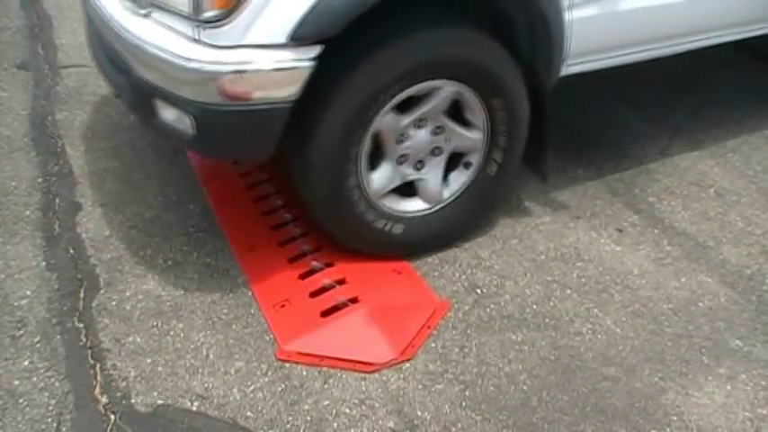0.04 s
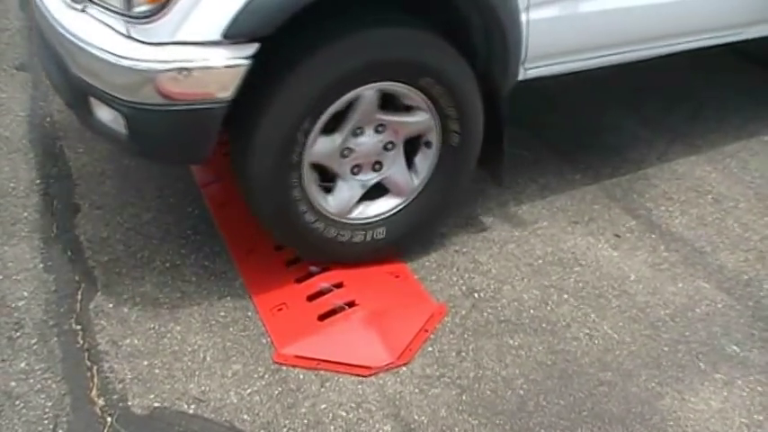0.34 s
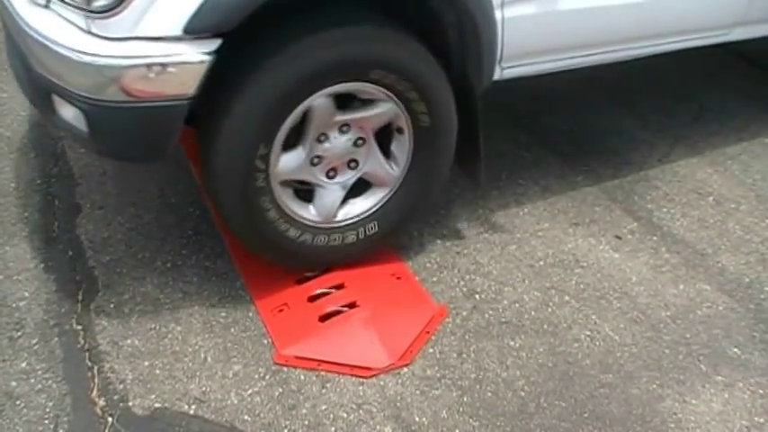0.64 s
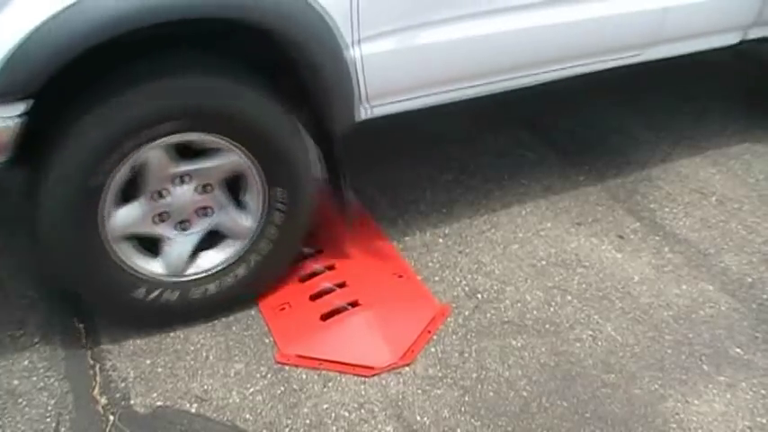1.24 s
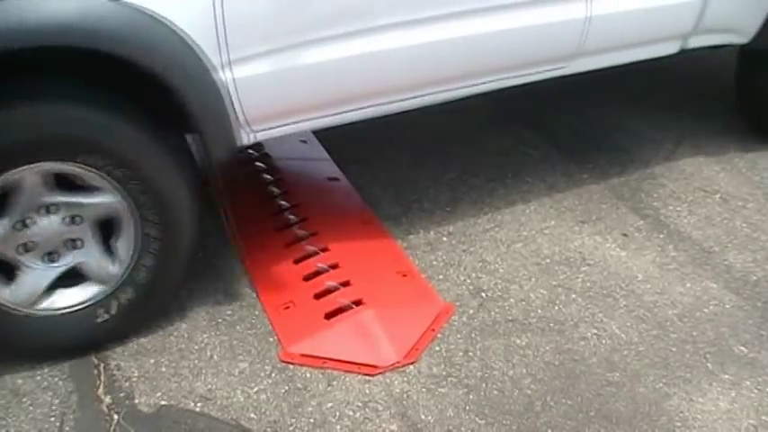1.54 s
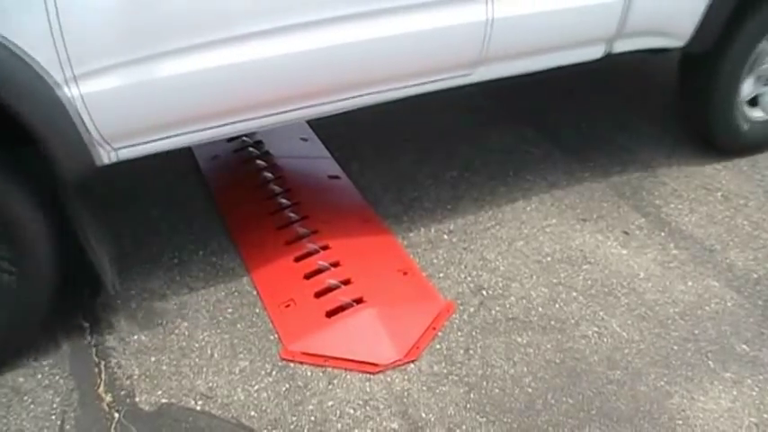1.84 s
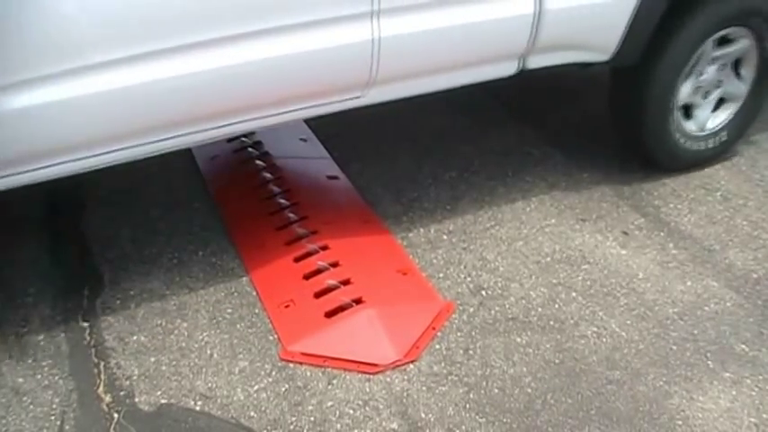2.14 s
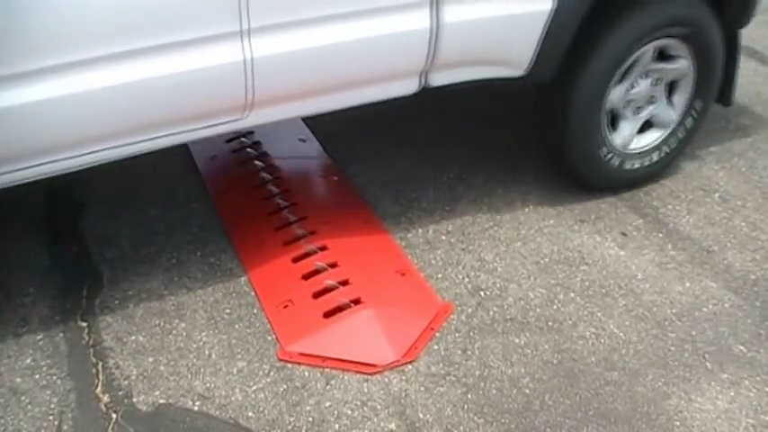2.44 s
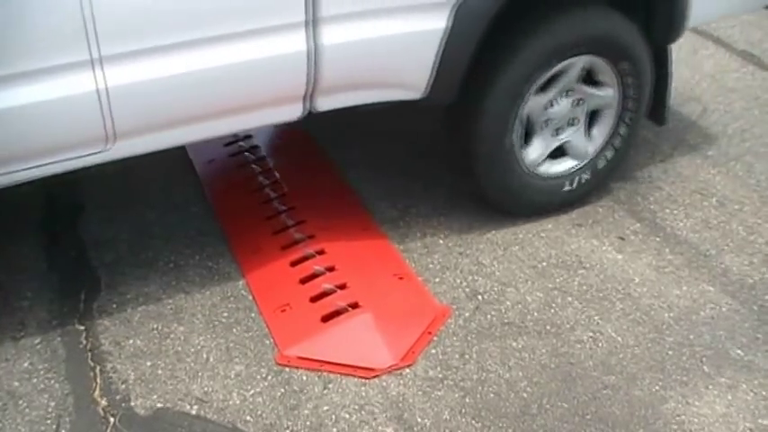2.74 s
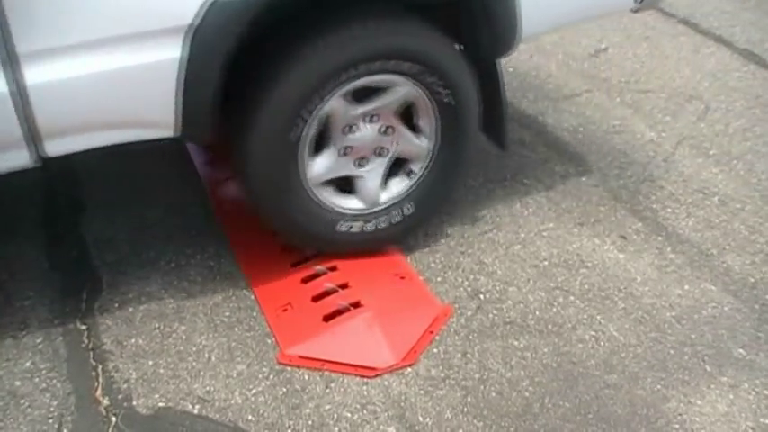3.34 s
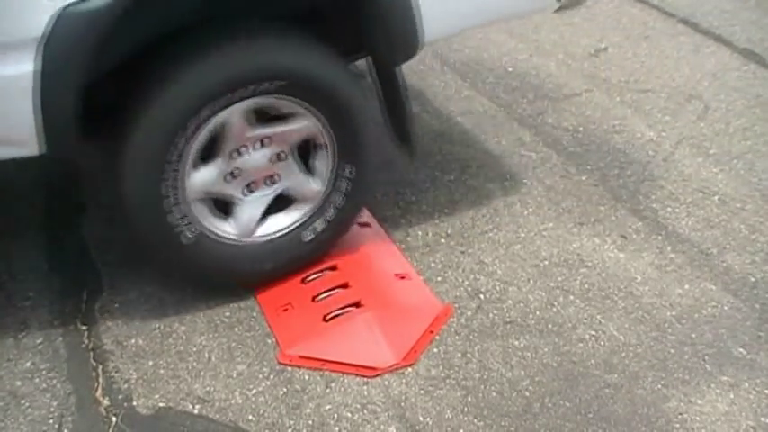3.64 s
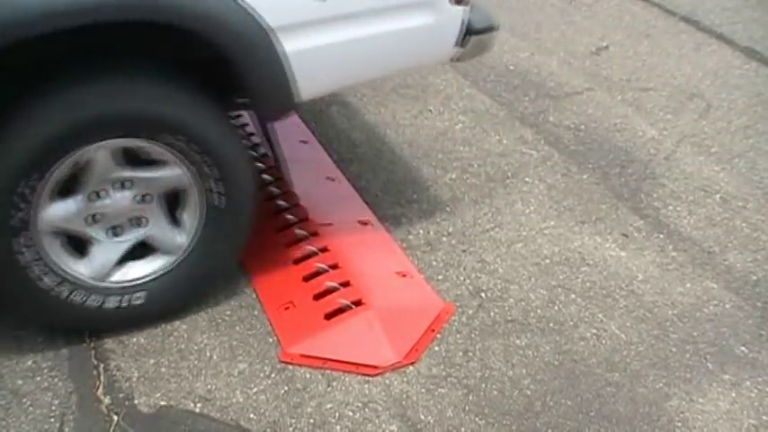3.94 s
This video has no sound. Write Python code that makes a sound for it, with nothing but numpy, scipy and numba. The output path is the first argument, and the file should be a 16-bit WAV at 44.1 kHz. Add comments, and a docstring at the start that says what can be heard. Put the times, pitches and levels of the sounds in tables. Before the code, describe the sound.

A steel spike strip clatters under a creeping pickup truck, heard close over a low engine, fan hiss and faint tire grit. A clack comes at 0.5 seconds, then a loud ringing clatter around 1.2 as the spikes snap back. A brake squeaks briefly at 2.7. The rear wheel lands with a thudding clank at 3.2, scrubs lightly, and releases another loud metallic clatter around 3.8.

```python
"""Pickup over a spike strip.

A pickup creeps over a steel spike strip on asphalt. Wheels knock the plate and fold the sprung spikes,
which snap back with a ringing clatter. The engine runs just above idle, its fan roars and hisses,
tyres crunch grit and scrub, a brake squeaks once. Heard close; a limiter ducks the hardest clacks."""
import sys
import numpy as np
from scipy import signal
from scipy.fft import rfft, irfft
from scipy.io import wavfile
from scipy.ndimage import uniform_filter1d
from numba import njit

SR = 44100
rng = np.random.default_rng(int(sys.argv[2]) if len(sys.argv) > 2 else 0)


def persist_wave(psi):
    """Save psi, clipped to +-1, as 16-bit WAV."""
    counts = np.round(np.clip(psi, -1, 1) * 32767).astype(np.int16)
    wavfile.write(sys.argv[1], SR, np.atleast_2d(counts).T)


N = 176400

# Running truck. Each row: time in seconds, then engine, fan roar and fan hiss levels in dB.
TRUCK_LEVELS = [(0, -41.5, -41, -45.5), (.5, -40, -39.5, -43), (.75, -36, -36, -40),
                (1.15, -38, -34.5, -43), (1.4, -31.5, -32, -38), (1.58, -37, -37, -43),
                (1.85, -41.5, -37.5, -43), (2.2, -41.5, -38.5, -42), (2.6, -42, -39, -43.5),
                (3.05, -41, -37.5, -44), (3.45, -42.5, -38.5, -44.5), (4, -38.5, -34.5, -42.5)]
# Base plate. Each row: mode frequency in Hz, relative level in dB, t60 in seconds.
BASE_PLATE_MODES = [(361, -9, 0.43), (647, -2, 0.19), (950, -1, 0.1), (1034, 4, 0.21), (1210, -5, 0.18),
                    (1346, 5.5, 0.15), (1430, -10, 0.6), (1690, -25, 0.081), (1944, -2.5, 0.1),
                    (2116, 1, 0.098), (2657, 3.5, 0.094)]
# Direction of the strip. Each row: frequency in Hz, left over right in dB, left lead in radians.
STRIP_DIRECTION = [(300, -2.5, 0.5), (1100, 3.5, 0.37), (2200, 3.5, 0), (3700, 1, 0.5), (5360, 4.5, 0.16),
                   (6360, 2.5, 1), (6600, 1, 1.5), (8300, -13, -17.5), (9700, -2, -3)]
ATTACK_S = 0.0034
BUZZ_DB, BUZZ_PER_S = 2, 87  # loose steel chatters as it rings


def undb(db):
    """Decibels to gain."""
    return 10 ** (np.asarray(db) / 20)


def unit(x):
    """Scale to rms 1."""
    return x / np.sqrt(np.mean(x ** 2) + 1e-18)


def curve(table):
    """Interpolate each column over time."""
    times, *columns = np.array(table, float).T
    return [np.interp(np.arange(N) / SR, times, c) for c in columns]


def spectrum(table, size):
    """Interpolate each column over log frequency."""
    hz, *columns = np.array(table, float).T
    return [np.interp(np.log(np.fft.rfftfreq(size, 1 / SR) + 1), np.log(hz), c) for c in columns]


def colour(x, table):
    """Filter by rows of frequency in Hz, gain in dB."""
    return irfft(rfft(x) * undb(spectrum(table, len(x))[0]), len(x))


def noise(table, size=N):
    """Coloured noise, rms 1."""
    return unit(colour(rng.standard_normal(size), table))


def walk(per_s, size=N):
    """Smooth random drift, rms 1."""
    hold = max(int(SR / per_s), 1)
    steps = rng.standard_normal(size)[np.arange(size) // hold]
    return unit(uniform_filter1d(steps, hold))


def stereo(mid, side, direction):
    """Direct sound with level and phase differences between left and right, plus diffuse sound."""
    balance_db, lead_rad = spectrum(direction, N)
    ratio = undb(balance_db) * np.exp(1j * lead_rad)
    spread = (ratio - 1) / (ratio + 1)
    spread = spread / np.maximum(1, np.abs(spread) / undb(3))  # at most 3 dB over mid
    apart = irfft(rfft(mid) * spread, N) + side
    return np.array([mid + apart, mid - apart])


def add(out, start_s, sound):
    """Mix a sound in at its time."""
    i = int(start_s * SR)
    out[..., i:i + sound.shape[-1]] += sound[..., :N - i]


def fade(t, t60_s):
    """Exponential decay."""
    return np.exp(-np.log(1000) * t / t60_s)


def ring(modes, t, damping=1, scatter_db=2.5):
    """Decaying modes, struck at a slightly different spot each time."""
    hz, db, t60_s = np.array(modes).T[:, :, None]
    gain = undb(db + scatter_db * rng.standard_normal(hz.shape))
    waves = np.sin(2 * np.pi * (hz * t + rng.random(hz.shape))) * fade(t * damping, t60_s)
    return (gain * waves).sum(axis=0) / np.sqrt(np.sum(gain ** 2) / 2)


def grit(per_s=100, level_db=-53, spread_db=1.5):
    """Stones crack under the tyres at random."""
    hits = rng.random(N) < per_s / SR
    cracks = hits * undb(spread_db * np.minimum(rng.exponential(size=N), 4))
    crunch = colour(cracks, [(200, 3), (1200, 10.5), (5500, -18), (9000, 8.5), (13000, -37)])
    return unit(crunch) * undb(level_db)


def fan(firings):
    """Air roars and hisses; the hiss throbs at the firing rate."""
    # Air noise spectra. Each row: frequency in Hz, density in dB.
    roar_colour = [(60, -6), (180, 0), (260, 4), (360, 2), (480, -0.5), (800, -5.5), (1250, -5),
                   (1650, -9.5), (2250, -7.5), (2900, -16), (5000, -16.5), (12000, -56)]
    hiss_colour = [(1000, -25), (3000, -5), (4000, -10), (5000, -3.5), (5600, 3.5), (6200, 2), (6900, -6.5),
                   (8000, -7), (9200, -9), (10500, -16), (12500, -34)]
    _, roar_db, hiss_db = curve(TRUCK_LEVELS)
    roar = noise(roar_colour) * undb(roar_db + walk(24.94))
    hiss = noise(hiss_colour) * undb(hiss_db + 0.38 * walk(22))
    throb = 1 + 0.045 * np.cos(2 * np.pi * firings)
    return roar + hiss * throb


def engine(firings, scatter_db=2.5, rumble_db=2.5):
    """Six uneven cylinders pulse over a rumble. Returns direct and diffuse sound."""
    # Relative level of each cylinder in dB, in firing order.
    cylinder_db = [1.5, 2.5, -4, 0, -6, -8]
    # Engine spectrum. Each row: frequency in Hz, gain in dB.
    engine_colour = [(26, -34), (35, -40), (55, -12.5), (75, -1.5), (105, 2), (155, 3), (200, -2),
                     (300, -11.5), (500, -24), (1500, -71)]
    at = np.flatnonzero(np.diff(np.floor(firings)))
    pulses = np.zeros(N)
    pulses[at] = undb(np.resize(cylinder_db, len(at)) + scatter_db * rng.standard_normal(N)[:len(at)])
    beat = unit(colour(pulses - pulses.mean(), engine_colour))
    direct = unit(beat + undb(rumble_db) * noise(engine_colour))
    gain = undb(curve(TRUCK_LEVELS)[0])
    return direct * gain, noise(engine_colour) * gain


def truck(speed_jitter=0.0118):
    """Engine, fan and grit, each with a direct and a diffuse part."""
    # Engine speed. Each row: time in seconds, firings per second.
    firing_rate = [(0, 51.8), (.9, 53.5), (1.7, 49), (2.1, 53.5), (2.9, 47.2), (3.5, 54.5), (4, 51)]
    # Stereo width. Each row: frequency in Hz, diffuse gain in dB.
    width = [(25, -6), (70, -24), (200, -21), (500, -14), (1200, -10), (4000, -12.5), (5800, -16.5),
             (7000, 6), (9000, 2), (12000, -17)]
    # Direction of the truck. Each row: frequency in Hz, left over right in dB, left lead in radians.
    direction = [(100, -2, 0), (700, 0, 0.52), (1300, 4, 0.5), (2300, 5, 0), (4200, 3.5, 0.18),
                 (5800, 3.5, -0.7), (6500, 2.5, -0.5), (7370, -7.5, -5.5), (9150, -6.5, -2)]
    firings = np.cumsum(curve(firing_rate)[0] * (1 + speed_jitter * walk(24.71))) / SR
    direct, diffuse = [part + fan(firings) + grit() for part in engine(firings)]
    return stereo(direct, colour(diffuse, width), direction)


def creaks(rough_db=3.5, chirp_s=0.022, chirp_hz=2266, chirp_width_hz=40):
    """Short, rough noise bands: tyre rubber sticking and slipping, and one tone with the brake squeak."""
    # Each row: start and length in seconds, level in dB, band centre and half-width in Hz.
    # At 2.759 s: a brief lower tone sounding with the brake squeak. The other rows are tyre scrubs.
    bursts = [(1.128, 0.095, -34, 1100, 900), (1.712, 0.15, -47.5, 1940, 300),
              (2.759, 0.034, -36.5, 1330, 120), (3.448, 0.13, -37, 2430, 520),
              (3.5, 0.018, -28.5, 2070, 550), (3.700, 0.057, -35, 1430, 900), (3.743, 0.018, -18, 1720, 90)]
    # Chirps of a stuttering tyre. Each row: start in seconds, level in dB.
    stutter = [(0.138, -49), (0.183, -48), (0.258, -45), (0.324, -42.5), (0.349, -47), (0.392, -52),
               (0.425, -51)]
    chirps = [(start_s, chirp_s, db, chirp_hz, chirp_width_hz) for start_s, db in stutter]
    out = np.zeros(N)
    for start_s, length_s, db, hz, width_hz in bursts + chirps:
        band = np.exp(-((np.fft.rfftfreq(SR, 1 / SR) - hz) / width_hz) ** 2)
        rasp = irfft(rfft(rng.standard_normal(SR)) * band) * undb(rough_db * walk(134, SR))
        size = int(length_s * SR)
        add(out, start_s, undb(db) * unit(rasp[:size]) * signal.windows.tukey(size, .5))
    return stereo(out, 0, STRIP_DIRECTION)


def brake(waver_hz=3.9, octave_db=-21, pan_db=4):
    """A pad sings one clean note and slides up as it lets go."""
    # Each row: time in seconds, pitch in Hz, level in dB.
    squeak = [(2.715, 3220, -45), (2.723, 3201, -25.5), (2.756, 3211, -23), (2.800, 3204, -27.5),
              (2.808, 3310, -36), (2.816, 3400, -43)]
    hz, db = curve(squeak)
    t = np.arange(N) / SR
    phase = 2 * np.pi * np.cumsum(hz + waver_hz * walk(150)) / SR
    gate = (t > squeak[0][0]) * (t < squeak[-1][0])
    note = (np.sin(phase) + undb(octave_db) * np.sin(2 * phase)) * undb(db) * gate
    return note * undb(np.array([[pan_db], [-pan_db]]) / 2)


def wheel_knocks():
    """A wheel bumps the strip against the asphalt: dull thud, hollow clank."""
    # Each row: start in seconds, thud and clank levels in dB, thud t60 in seconds.
    knocks = [(0.4957, -21.5, -35, 0.087), (1.177, -18, -32, 0.085), (3.201, -16.5, -19, .1)]
    # Thud spectrum. Each row: frequency in Hz, density in dB.
    thud_colour = [(80, -10), (330, 1), (700, 5.5), (1300, -8.5), (2400, -18), (9000, -70)]
    size = SR // 2
    t, out = np.arange(size) / SR, np.zeros(N)
    for start_s, thud_db, clank_db, t60_s in knocks:
        thud = undb(thud_db) * noise(thud_colour, size) * fade(t, t60_s)
        clank = undb(clank_db + BUZZ_DB * walk(BUZZ_PER_S, size)) * ring(BASE_PLATE_MODES, t)
        add(out, start_s, (thud + clank) * np.minimum(t / ATTACK_S, 1))
    return stereo(out, 0, STRIP_DIRECTION)


def shaft_snaps():
    """Freed spikes hit their stop and leave their shaft ringing."""
    # Each row: start in seconds, level in dB.
    snaps = [(1.2185, -18), (3.797, -11.5)]
    # Each row: mode frequency in Hz, relative level in dB, t60 in seconds.
    shaft_modes = [(974, -11, 0.35), (1315, -10, 0.35), (1448, -3, 0.52), (1785, 1, 0.2), (2012, 1, 0.2),
                   (2078, 0, 0.42), (2170, 1, 0.3), (2616, -8, 0.3)]
    t, out = np.arange(SR) / SR, np.zeros(N)
    for start_s, db in snaps:
        clang = undb(db + BUZZ_DB * walk(BUZZ_PER_S, SR)) * ring(shaft_modes, t)
        add(out, start_s, clang * np.minimum(t / ATTACK_S, 1))
    return stereo(out, 0, STRIP_DIRECTION)


def spike_clatter(hold_s=0.0038, chatter_db=1.82, plate_ring_db=-9, spike_buzz_db=4, free_t60_s=0.15):
    """Each blow cracks steel on steel, buzzes the spikes and rattles the plate, which rings on."""
    # Each row: start in seconds, plate, crack and spike levels in dB, rattle t60 in seconds.
    blows = [(0.4948, -20.5, -12.5, -43, 0.064), (0.772, -44, -28.5, -54, 0.032),
             (1.0398, -39, -23.5, -38, 0.022), (1.112, -35, -36, -55, 0.02), (1.146, -37, -33, -54, 0.34),
             (1.176, -13.5, -13, -29, 0.15), (1.194, -18, -19, -35, 0.059), (1.2119, -9, -12, -29, 0.016),
             (1.2185, -4.5, 3, -0.5, 0.11), (1.248, -10, -11, -10, 0.18), (1.548, -46, -32.5, -42, 0.11),
             (3.2005, -13.5, -25.5, -36, 0.15), (3.206, -18, -19, -19, 0.12),
             (3.374, -33.5, -33.5, -41, 0.5), (3.394, -23, -29, -36, .11), (3.499, -27.5, -32.5, -53, 0.14),
             (3.742, -16, -17.5, -22, 0.24), (3.781, -10.5, -10, -13.5, 0.11),
             (3.800, -10.5, 1, -2.5, 0.19), (3.844, -15.5, -18.5, -12, 0.19),
             (3.897, -21.5, -24.5, -27, 0.26)]
    # Each row: mode frequency in Hz, relative level in dB, t60 in seconds.
    spike_modes = [(5510, -8, 0.14), (5230, -5, 0.14), (5733, 7, 0.12), (6052, 10, .1), (6330, -5, 0.097)]
    # Rattle and crack spectra. Each row: frequency in Hz, density in dB.
    plate_colour = [(80, -44), (600, -4.5), (1000, 1), (1600, 2.5), (2200, 3.5), (3000, -14.5), (5000, -37),
                    (12000, -60)]
    crack_colour = [(100, -39), (1500, -6), (2600, -5), (6000, -1.5), (7500, -5.5), (8600, -15),
                    (10500, -24), (13000, -48)]
    size = SR // 2
    t, mid_side = np.arange(size) / SR, np.zeros((2, N))
    for start_s, plate_db, crack_db, spike_db, t60_s in blows:
        rattle = fade(np.maximum(t - hold_s, 0), t60_s)  # held while several spikes land
        rattle *= undb(chatter_db * (walk(547, size) - 2.06))
        damping = free_t60_s / t60_s  # a resting tyre shortens the plate's ring
        plate_env = np.hypot(rattle, undb(-24) * fade(t * damping, t60_s=0.29))
        crack_env = np.hypot(rattle, undb(-16) * fade(t, t60_s=0.094))
        for channel in mid_side:
            plate = plate_env * noise(plate_colour, size)
            plate += undb(plate_ring_db) * ring(BASE_PLATE_MODES, t, damping)
            spikes = ring(spike_modes, t) * undb(spike_buzz_db * walk(180, size))
            crack = crack_env * noise(crack_colour, size)
            blow = undb(plate_db) * plate + undb(crack_db) * crack + undb(spike_db) * spikes
            add(channel, start_s, blow * np.minimum(t / ATTACK_S, 1))
    mid, side = mid_side
    diffuse = colour(side, [(400, -18), (1000, -38), (6000, -38), (8000, -9)])
    return stereo(mid, diffuse, STRIP_DIRECTION)


def scene():
    """Truck, strip and small squeaks, in stereo."""
    return truck() + spike_clatter() + wheel_knocks() + shaft_snaps() + creaks() + brake()


@njit
def follow(x, attack, release):
    """Peak follower: fast up, slow down."""
    out, peak = np.empty(len(x)), 0.
    for i in range(len(x)):
        peak += (x[i] - peak) * attack if x[i] > peak else -peak * release
        out[i] = peak
    return out


def record(dry, limit_db=-8.5, attack_s=0.00025, release_s=0.14, top_hz=13200):
    """Treble-sensitive limiter, soft clip, low-pass."""
    sensed = np.array([colour(channel, [(2500, 0), (6000, 4.5)]) for channel in dry])
    peak = follow(np.abs(sensed).max(axis=0), 1 / (attack_s * SR), 1 / (release_s * SR))
    gain = np.minimum(1, undb(limit_db) / (peak + 1e-9))
    clipped = 0.67 * np.tanh(dry * gain / 0.72)
    return signal.sosfilt(signal.ellip(8, .2, 80, top_hz, fs=SR, output="sos"), clipped)


dry = scene()
out = record(dry)
persist_wave(out)
```